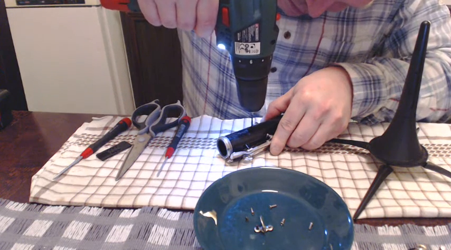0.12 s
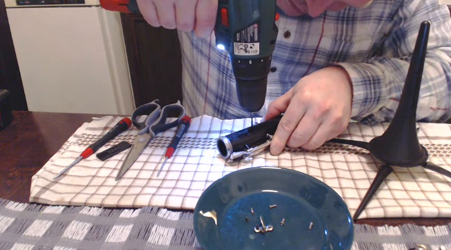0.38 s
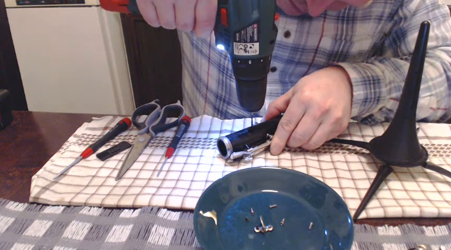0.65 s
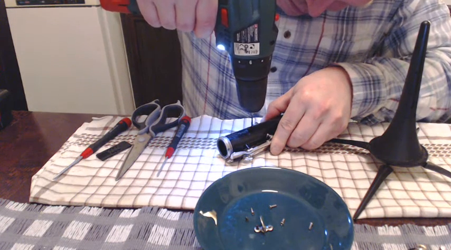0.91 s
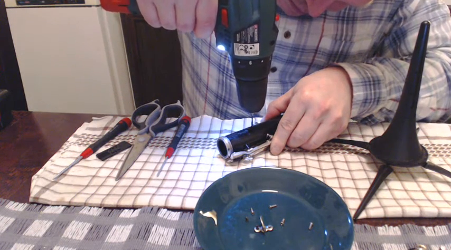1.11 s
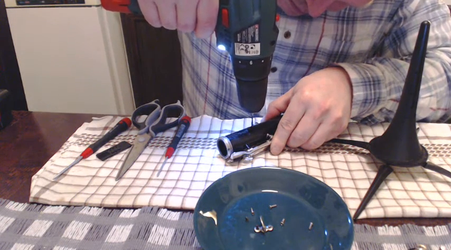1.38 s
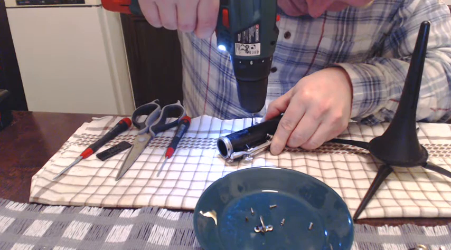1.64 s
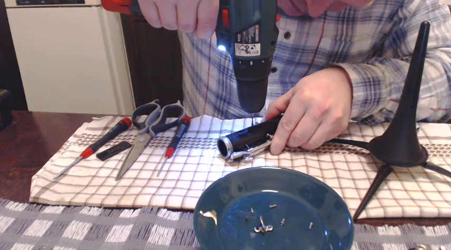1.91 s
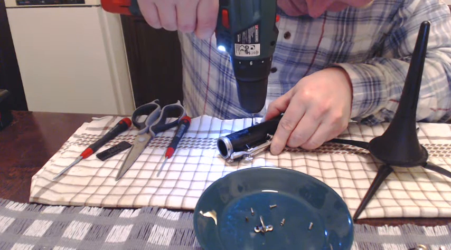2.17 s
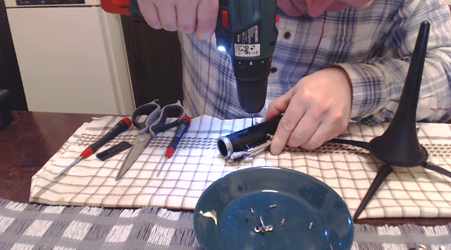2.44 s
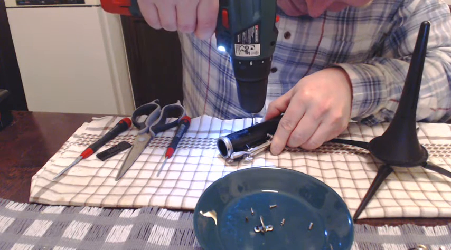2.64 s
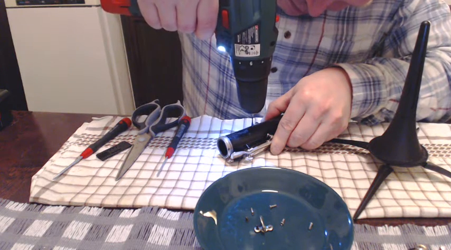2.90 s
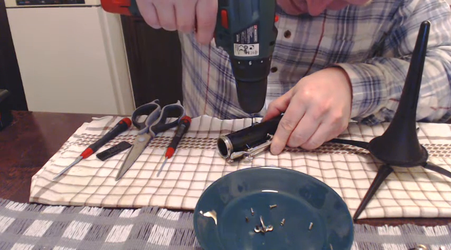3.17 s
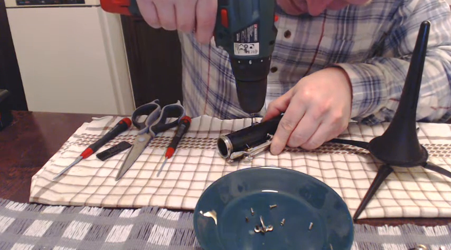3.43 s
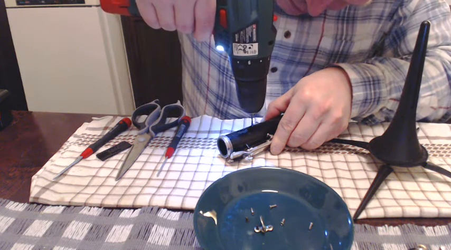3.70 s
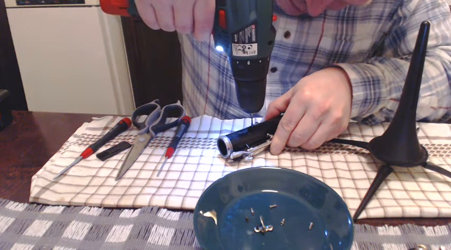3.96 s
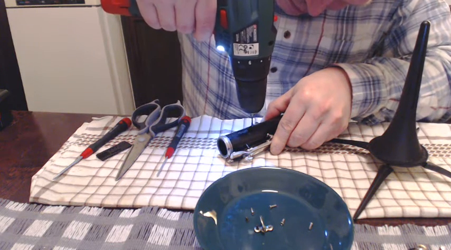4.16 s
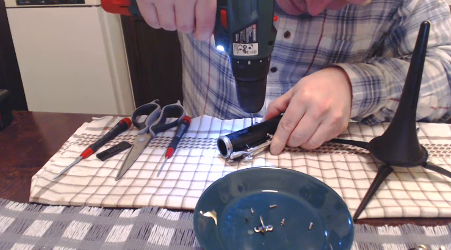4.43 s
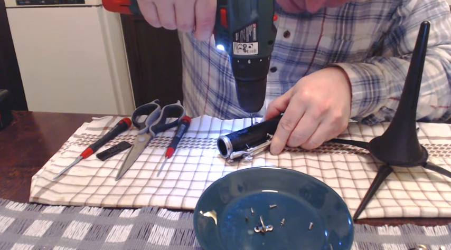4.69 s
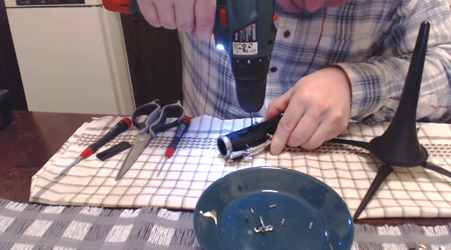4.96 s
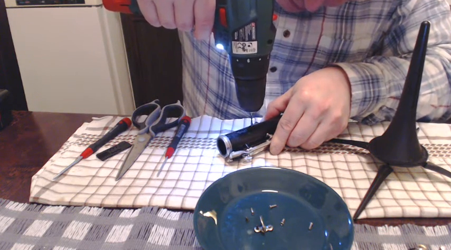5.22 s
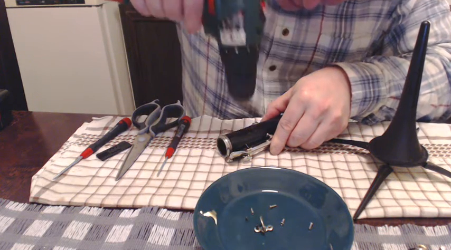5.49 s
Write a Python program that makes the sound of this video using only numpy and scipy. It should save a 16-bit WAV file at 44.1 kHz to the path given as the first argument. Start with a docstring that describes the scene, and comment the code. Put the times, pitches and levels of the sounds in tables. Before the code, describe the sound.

From the start a cordless drill runs under load, close up: a steady, harsh electric whine of many stacked tones over grainy gear clatter, with a resonant plastic housing and hardly any pitch change. From about 2.9 s the pitch sags, and at 3.15 s it brakes almost instantly with a solid dull clunk, the treble dying first. A short room tail gives way to low household hum, soft hiss and a very faint, rapid high electronic pip. Tiny clicks occur around 3.26 and 3.55 s. At 3.76 s a trigger click starts a lighter, thinner burst that spins up quickly, whirs with bright chuck rattle, slightly fuller in the middle, then slows from 4.4 s and cuts near 4.8 s. A click sounds at 5.08 s. A last short burst rises at 5.22 s, drops quickly in pitch and stops at 5.53 s with a sharp knock. Tiny timing skips recur about twice a second.

```python
"""A cordless drill whirs steadily as it bores into a small wooden tube, stops, then gives two lighter bursts.
Its whines are sine tones at multiples of the shaft speed, over clatter made of noise that rings the housing.
Trigger, brake and gear knocks are short scrapes that ring a set of decaying tones.
A small room adds a short tail; noise and wavering tones hum behind, with a faint, quick electronic pip.
About twice a second the whole sound skips ahead by a few samples."""
import sys
import numpy as np
from scipy import signal
from scipy.fft import rfft, irfft
from scipy.io import wavfile
from scipy.ndimage import uniform_filter1d, map_coordinates

SR = 44100
rng = np.random.default_rng(int(sys.argv[2]) if len(sys.argv) > 2 else 0)


def volts_from_db(level):
    """Convert decibel levels to linear amplitude ratios."""
    exponent = np.asarray(level, float) / 20
    return 10 ** exponent


def wrap_up_sound(samples):
    """Save the sound to the file named by the first command line argument, as 16-bit audio."""
    columns = np.atleast_2d(samples).T
    # keep every value between -1 and 1, then stretch to whole-number steps
    tamed = np.clip(columns, -1, 1)
    steps = np.round(tamed * 32767).astype(np.int16)
    wavfile.write(sys.argv[1], SR, steps)


N = 246519
T = np.arange(N) / SR  # time of every sample, s

# light trigger squeezes: [start_s, spin_up_s, top_speed_hz, level_db, ease_s, sag_hz_per_s2, cut_s]
LIGHT_BURSTS = [(3.756, .058, 261.4, -29, 4.44, 1153, 4.785), (5.215, .048, 240.2, -29, 5.46, 4020, 5.528)]
# whines while boring: [multiple_of_shaft_speed, level_re_clatter_db, growth_db_per_s]
BORING_TONES = [(.8, -32, 0), (1, -27, 0), (2, -21, -1), (3, -24, 1), (3.4, -28, 0), (5.83, -18, 1),
                (6, -20, 1), (7.2, -23, 0), (9.47, -24, 0), (12, -24, 0), (18, -25, 0), (18.92, -23, 0),
                (20.13, -23, 0), (21, -24, 1), (24, -23, 0), (27, -22.5, 0), (30, -24.5, 0), (33, -32, -1),
                (36, -35, 0), (39, -31, 3), (40, -38, 0), (42, -33, 0), (43, -36, 0), (44, -36, 0),
                (45, -34, 1), (48, -44, 0)]
# one list of whines for each light burst: [multiple_of_shaft_speed, level_re_clatter_db, growth_db_per_s]
BURST_TONES = [
    [(1, -21, 0), (2, -16, 0), (3, -20, 0), (3.32, -22, 0), (5, -25, 0), (10, -19, 0), (10.83, -15, 0),
     (11.14, -16, 0), (13, -15, 0), (13.42, -12, 0), (16.6, -14, 0), (20, -17, 0), (23.4, -23, 0)],
    [(2, -26, 0), (3, -20, 0), (6, -24, 0), (9, -19, 0), (12, -8, 0), (15, -7, 0), (18, -16, 0),
     (21, -15, 0), (24, -24, 0), (27, -27, 0)],
]
# broad tone colour of the clatter while boring: [pitch_hz, relative_level_db]
BORING_CLATTER = [(35, -54), (60, -33), (175, -7), (395, -6), (454, 0.5), (1020, -5), (1350, 0), (1490, 0),
                  (1920, 4), (2480, -2), (2850, 1.5), (3130, -2), (6890, -9.5), (10000, -17.5),
                  (15600, -35)]
# broad tone colour of the clatter in the bursts: [pitch_hz, relative_level_db]
BURST_CLATTER = [(35, -71), (60, -24), (242, -4), (404, -13.5), (510, -5.5), (643, -11.5), (793, 0.5),
                 (1020, -9.5), (1920, -4.5), (2370, -7.5), (2850, -1.5), (3130, -7), (3510, -3),
                 (5100, -4.5), (15600, -35)]
# resonances of the drill housing: [pitch_hz, width_hz, boost_db]
HOUSING_RINGS = [(189, 55, 3.9), (456, 35, 7), (574, 47, 7.6), (1336, 180, 1.6), (1688, 67, 3.9),
                 (1902, 150, 3.5), (2844, 177, 4.76), (3444, 376, 6.3), (5030, 220, 6.2),
                 (11400, 760, 0.54)]
# trigger, brake and gear knocks, before their band filter: [start_s, peak_db, dullness_0_to_1.5]
KNOCK_TIMES = [(3.152, -9, 1.1), (3.159, -15, 1.5), (3.262, -32, .6), (3.553, -30, .4), (3.589, -42, .1),
               (3.763, -29, .4), (3.769, -19, .55), (3.7713, -19, .2), (3.802, -24, .3), (4.852, -37, .6),
               (5.080, -19, .3), (5.091, -33, .35), (5.223, -24, .3), (5.233, -27, .15), (5.526, -17, .5)]
# tones that a knock rings: [pitch_hz, relative_level_db, fall_by_60_db_s]
KNOCK_TONES = [(520, -12, .06), (800, -12, .035), (1050, -10, .03), (1500, -7, .02), (1900, -5, .02),
               (2900, 4, .018), (3150, 0, .01), (3500, 0, .015), (5100, -7, .01), (6800, -10, .01),
               (8100, -11, .01), (10400, -13, .008)]
# tone colour of the background hiss: [pitch_hz, relative_level_db]
HISS_COLOUR = [(24, -71), (40, -44), (117, -18), (136, -10.5), (280, -14.5), (351, -7.5), (397, -17.5),
               (439, -5), (510, -10), (1080, -11.5), (1530, -14), (2450, -13.5), (2700, -23), (3940, -27.5),
               (8130, -35.5), (11000, -45), (15600, -56)]
# wavering tones in the hum: [pitch_hz, rms_level_db]
HUM_TONES = [(441, -62), (931, -67), (1082, -63), (1265, -67), (2350, -70), (4974, -83), (9001, -87)]
# microphone pair, left minus right: [pitch_hz, difference_db]
LEFT_MINUS_RIGHT = [(60, -.3), (300, -.6), (520, -.9), (860, -1.4), (1200, -.5), (1600, 0), (4000, 0),
                    (4300, -.5), (5000, -2.8), (5700, -1.1), (6400, 0), (16000, 0)]
# brief steps up or down in the level of the bursts: [start_s, length_s, change_db]
BRIEF_STEPS = [(3.834, .02, 1), (4.672, 0.027, -2.5), (5.317, 0.022, -1)]

# boring under load: steady until the trigger eases, then braked
BORE_HZ, BORE_DB, BORE_CREEP_HZ_PER_S = 229.54, -22, .3
BORE_EASE_S, BORE_SAG_HZ_PER_S2, BORE_BRAKE_S = 2.9, 460, 3.173
BORE_STRAIN_DB = 1  # the middle whines swell as the shaft sags
BRAKE_DULL_DB, BRAKE_DULL_S, BRAKE_DB_PER_S = -20, 0.019, 258  # the treble dies first
SPEED_DB_PER_OCTAVE, BASS_DB_PER_OCTAVE = 10, -8  # slower is quieter; in the bursts also darker

# bursts: whines are loud while speeding up hard and fade once the trigger eases
PUSH_DB, PUSH_HZ_PER_S, EASED_DB = 6.5, 700, -5
ATTACK_S, FADE_DB_PER_S = .033, 220
FREE_BASS_DB = -9
BITE_START_S, BITE_END_S, BITE_DB = 3.88, 4.62, 4  # the bit bites into the wood and the bass fills in
DROP_S, DROP_DB = 4.675, -1  # the level steps down until the second burst

HISS_DB, HUM_WAVER_DB = -48.5, 2.5
PIP_HZ, PIP_DB, PIP_ON_S = 8040, -66, 0.016
PIP_START_S, PIP_EVERY_S = .0140, .066425
ROOM_T60_S, ROOM_DB = 0.18, -11.5
SKIP_START_S, SKIP_EVERY_S, SKIP_SAMPLES = .3975, .4986, 24


def level(x, db):
    """Scales a sound to a given rms level in dB."""
    return x * volts_from_db(db) / np.sqrt(np.mean(x ** 2))


def shape_db(hz, colour, peaks=()):
    """Gain in dB of a broad colour plus resonances."""
    f, db = np.transpose(colour)
    broad = np.interp(np.log(hz + 1), np.log(f), db)
    return broad + sum(boost / (1 + (2 * (hz - centre) / width) ** 2) for centre, width, boost in peaks)


def filtered(x, colour, peaks=()):
    """Filters with that shape; folding the cepstrum keeps all ringing after its cause."""
    log_gain = shape_db(np.linspace(0, SR / 2, 2049), colour, peaks) * np.log(10) / 20
    cepstrum = irfft(log_gain)
    cepstrum[1:2048] *= 2
    cepstrum[2049:] = 0
    response = irfft(np.exp(rfft(cepstrum)))
    return signal.fftconvolve(x, response)[:N]


def walk(rate):
    """Random wander of spread 1: levels held for 1 / rate s, then smoothed twice."""
    hold = int(SR / rate)
    steps = np.repeat(rng.standard_normal(N // hold + 1), hold)
    smooth = uniform_filter1d(uniform_filter1d(steps, hold), hold)
    return level(smooth[:N], 0)


def split(x, hz):
    """The parts below and above hz."""
    return [signal.sosfilt(signal.butter(4, hz, kind, fs=SR, output="sos"), x) for kind in ("low", "high")]


def slowed(top_hz, ease_s, sag):
    """Shaft speed that sags ever faster once the trigger eases, down to 30 Hz."""
    return np.maximum(top_hz - sag * np.maximum(T - ease_s, 0) ** 2, 30)


def between(start_s, end_s):
    """A gate with edges about 14 ms long."""
    return uniform_filter1d(1. * ((T > start_s) & (T < end_s)), size=600)


def drill(shaft_hz, whines, colour, steady_hz, wobble, flicker_db, carrier_db, brush_db, rattle_db,
          press_db, flicker_rate):
    """Whines locked to the shaft, over clatter that throbs with the gear carrier and three armature poles."""
    turn = 2 * np.pi * np.cumsum(shaft_hz * (1 + wobble * walk(25))) / SR  # shaft angle, radians
    throb_db = carrier_db * np.cos(turn / 4.3) + rattle_db * walk(300) + 0.19 * walk(20)

    # now and then a tooth or a wood chip snaps much harder than the rest
    teeth = rng.standard_normal(N) * volts_from_db(throb_db + 11.8 * (rng.random(N) < .006))
    pole_db = brush_db * (np.cos(3 * turn) + 0.37 * np.cos(turn))
    brushes = rng.standard_normal(N) * volts_from_db(pole_db + throb_db)
    high = signal.butter(2, 7000, "high", fs=SR, output="sos")
    low = signal.butter(2, 7000, fs=SR, output="sos")
    rough = signal.sosfilt(low, teeth) + signal.sosfilt(high, brushes)
    clatter = level(filtered(rough, colour, HOUSING_RINGS), 0)

    sung = 0
    for order, db, growth_db in whines:
        # a whine swells as it sweeps through a resonance (worked out every 64 samples)
        steady_db = shape_db(order * steady_hz, colour, HOUSING_RINGS)
        sweep_db = shape_db(order * shaft_hz[::64], colour, HOUSING_RINGS) - steady_db
        swell_db = 0.97 * np.repeat(sweep_db, 64)[:N]
        # tooth pressure changes the middle orders only
        tooth_db = press_db * (4 < order < 30)
        gain = volts_from_db(db + growth_db * (T - 1.0) + tooth_db + swell_db + flicker_db * walk(flicker_rate))
        sung = sung + gain * np.sqrt(2) * np.sin(order * turn + rng.uniform(0, 2 * np.pi))
    return clatter + sung


def boring():
    """The long loaded run: the shaft slows before the brake, then the sound dulls as it dies."""
    shaft_hz = slowed(BORE_HZ + BORE_CREEP_HZ_PER_S * T, BORE_EASE_S, BORE_SAG_HZ_PER_S2)
    strain_db = BORE_STRAIN_DB * np.clip((T - BORE_EASE_S) / (BORE_BRAKE_S - BORE_EASE_S), 0, 1)
    sound = drill(shaft_hz, BORING_TONES, BORING_CLATTER, steady_hz=230.5, wobble=0.000804,
                  flicker_db=2.5, carrier_db=0.4, brush_db=4.5, rattle_db=1.0,
                  press_db=strain_db, flicker_rate=45)
    body, treble = split(sound, 5700)
    braked = np.maximum(T - BORE_BRAKE_S, 0)  # seconds since the brake
    dull_db = BRAKE_DULL_DB * (1 - np.exp(-braked / BRAKE_DULL_S))
    speed_db = SPEED_DB_PER_OCTAVE * np.log2(shaft_hz / BORE_HZ)
    db = BORE_DB + speed_db - BRAKE_DB_PER_S * braked + .5 * walk(3.43)
    return (body + treble * volts_from_db(dull_db)) * volts_from_db(db)


def room(x):
    """Short dying-noise echo; almost only its bass differs between left and right."""
    t = np.arange(int(.4 * SR)) / SR
    mid, side = rng.standard_normal((2, len(t))) * volts_from_db(-60 * t / ROOM_T60_S) * (t > .004)
    bass_band = signal.butter(1, [90, 250], "band", fs=SR, output="sos")
    side = signal.sosfilt(bass_band, side) + volts_from_db(-48) * side
    tails = np.array([signal.fftconvolve(x, mid + k * 0.93 * side)[:N] for k in (1, -1)])
    return tails * volts_from_db(ROOM_DB) / np.sqrt(np.sum(mid ** 2))


def hum():
    """Household appliance hiss (coloured noise) with wavering tones, and a gated electronic pip."""
    mid, side = (level(filtered(rng.standard_normal(N), HISS_COLOUR), HISS_DB) for _ in range(2))
    tones = 0
    for hz, db in HUM_TONES:
        gain = volts_from_db(db + HUM_WAVER_DB * walk(10)) * np.sqrt(2)
        phase = 2 * np.pi * np.cumsum(hz * (1 + 0.00303 * walk(10))) / SR
        tones = tones + gain * np.sin(phase)
    gate = uniform_filter1d(1. * ((T - PIP_START_S) % PIP_EVERY_S < PIP_ON_S), size=40)
    pip = volts_from_db(PIP_DB) * np.sqrt(2) * gate * np.sin(2 * np.pi * PIP_HZ * T)
    return mid + tones + pip + volts_from_db(-20.5) * side * np.array([[1], [-1]])


def knocks():
    """Each knock is a short scrape into the same ringing tones; dull ones lose the treble."""
    out, t = np.zeros(N + 4410), np.arange(4410) / SR
    hz, db, t60 = np.transpose(KNOCK_TONES)[:, :, None]
    chance = rng.standard_normal((len(KNOCK_TIMES), len(hz) + 256))
    for (start_s, peak_db, dull), c in zip(KNOCK_TIMES, chance):
        tilt_db = -14 * (dull - .3) * np.log2(hz / 2000) + 1.5 * c[:len(hz), None]
        ring = np.sum(volts_from_db(db + tilt_db - 60 * t / t60) * np.sin(2 * np.pi * hz * t), axis=0)
        scrape = c[-256:] * np.exp(-t[:256] / 0.00012)
        ring = np.convolve(ring, scrape)[:len(t)]
        first = int(start_s * SR)
        out[first:first + len(t)] += volts_from_db(peak_db) * ring / np.abs(ring).max()
    return signal.sosfilt(signal.butter(2, [300, 13000], "band", fs=SR, output="sos"), out[:N])


def chatter():
    """Loose chuck parts: noise of random, uneven strength that rings in a high band."""
    ticks = rng.standard_normal(N) * volts_from_db(7 * walk(90))
    ring = signal.sosfilt(signal.butter(2, [10600, 12000], "band", fs=SR, output="sos"), ticks)
    return level(ring, -26.5) + level(split(ticks, 6000)[1], -51)


def bursts():
    """Two short squeezes of the trigger; level, bass and whines follow the speed."""
    out = 0
    step_db = DROP_DB * between(DROP_S, LIGHT_BURSTS[1][0])
    step_db = step_db + sum(db * between(s, s + length) for s, length, db in BRIEF_STEPS)
    for (start_s, spin_up_s, top_hz, db, ease_s, sag, cut_s), whines in zip(LIGHT_BURSTS, BURST_TONES):
        since = np.maximum(T - start_s, 0)
        shaft_hz = np.maximum(slowed(top_hz, ease_s, sag) * (1 - np.exp(-since / spin_up_s)), 1)
        speeding_up = np.maximum(np.gradient(shaft_hz) * SR / PUSH_HZ_PER_S, 0)
        eased = np.clip((T - ease_s) / (cut_s - ease_s), 0, 1)
        press_db = PUSH_DB * np.tanh(speeding_up ** 2) + EASED_DB * eased
        sound = drill(shaft_hz, whines, BURST_CLATTER, steady_hz=top_hz, wobble=.004,
                      flicker_db=3.5, carrier_db=-0.7, brush_db=3.5, rattle_db=1.7,
                      press_db=press_db, flicker_rate=70)
        bass, treble = split(sound, 2060)
        octaves = np.log2(shaft_hz / top_hz)  # negative when slower than top speed
        bite_db = BITE_DB * between(BITE_START_S, BITE_END_S)
        bass_db = FREE_BASS_DB + BASS_DB_PER_OCTAVE * octaves + bite_db
        fade_db = FADE_DB_PER_S * np.maximum(T - cut_s, 0)
        gain = volts_from_db(db + SPEED_DB_PER_OCTAVE * octaves - fade_db + step_db)
        attack = np.minimum(since / ATTACK_S, 1) ** 2
        out = out + attack * gain * (treble + chatter() + bass * volts_from_db(bass_db))
    return out


def scene():
    """Drill and knocks, their room tail, and the hum behind."""
    near = boring() + bursts() + knocks()
    return near + room(near) + hum()


def low_pass(x):
    """Removes everything above the highest recorded frequency."""
    return signal.sosfilt(signal.butter(12, 15710, fs=SR, output="sos"), x)


def record(dry):
    """Unequal microphones, a bass cut, and a slow clock that skips ahead about twice a second."""
    pair = np.array([filtered(channel, [(hz, sign * db / 2) for hz, db in LEFT_MINUS_RIGHT])
                     for channel, sign in zip(dry, (1, -1))])
    cut = signal.sosfilt(signal.butter(2, 70, "high", fs=SR, output="sos"), pair)
    # the reading place lags steadily, then jumps ahead
    place = np.arange(N) + SKIP_SAMPLES * (.5 - (T - SKIP_START_S) / SKIP_EVERY_S % 1)
    mix = np.array([map_coordinates(channel, [place], order=5, mode="mirror") for channel in cut])
    return low_pass(mix)


dry = scene()
out = record(dry)
wrap_up_sound(out)
```